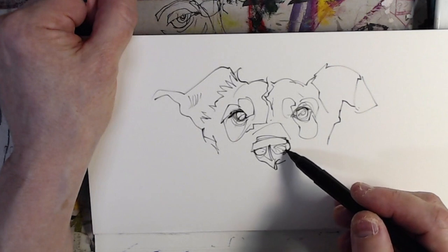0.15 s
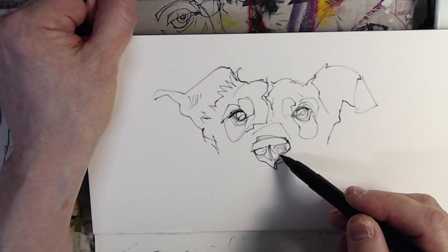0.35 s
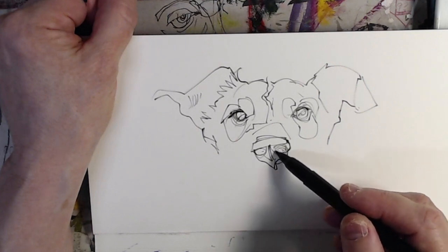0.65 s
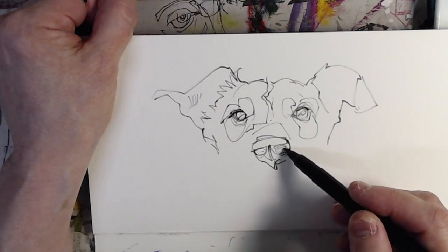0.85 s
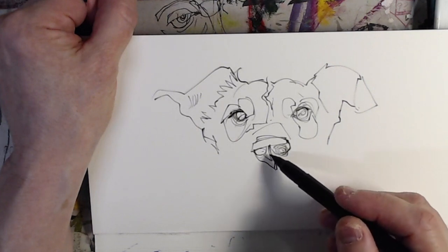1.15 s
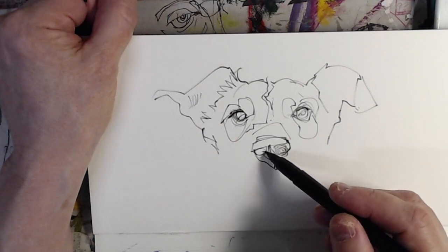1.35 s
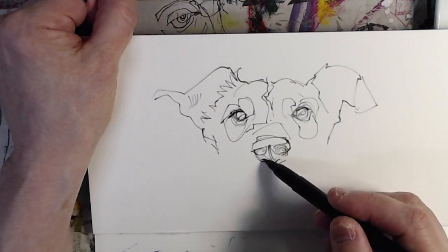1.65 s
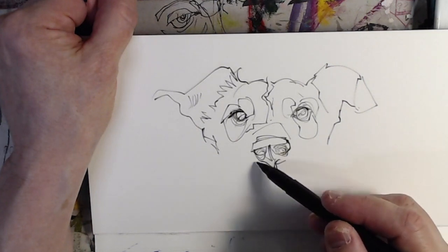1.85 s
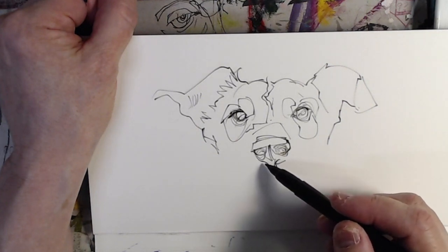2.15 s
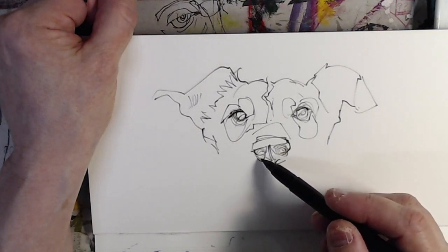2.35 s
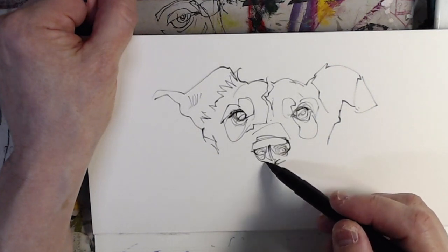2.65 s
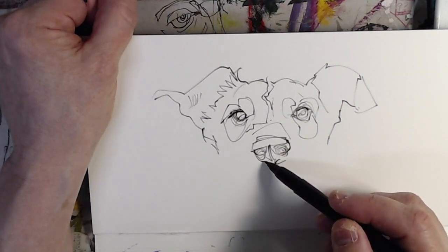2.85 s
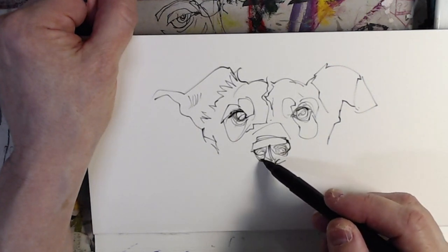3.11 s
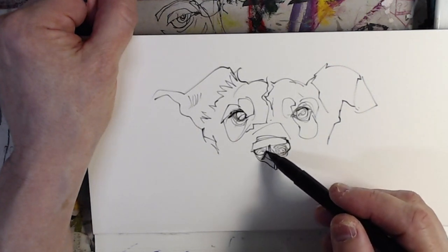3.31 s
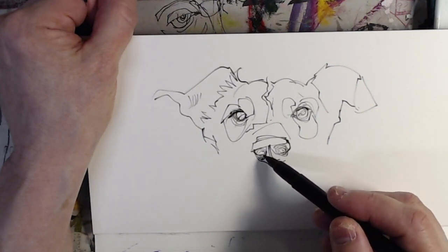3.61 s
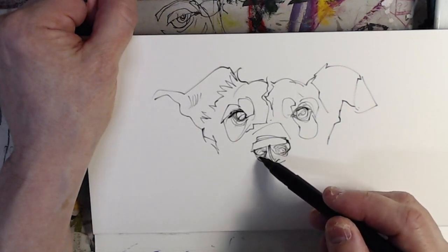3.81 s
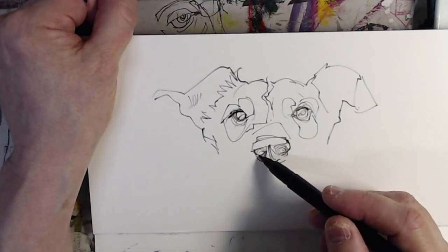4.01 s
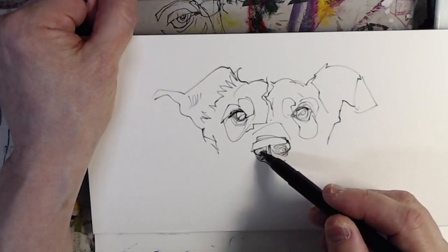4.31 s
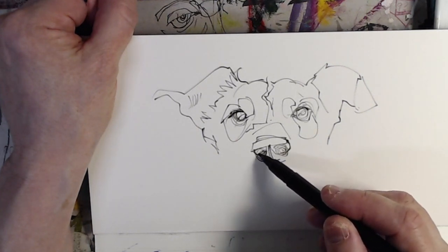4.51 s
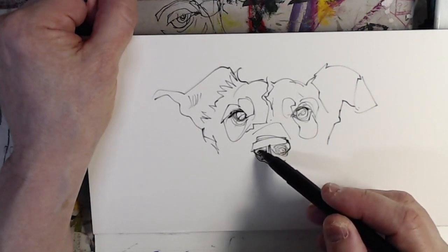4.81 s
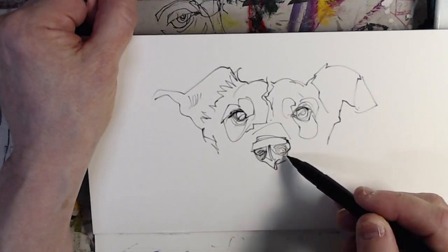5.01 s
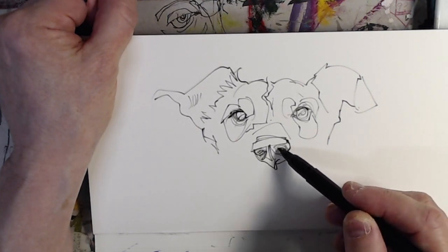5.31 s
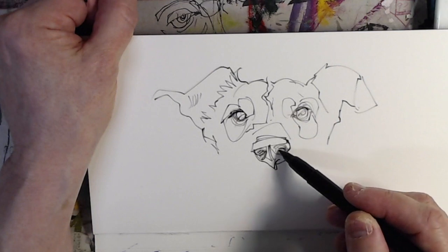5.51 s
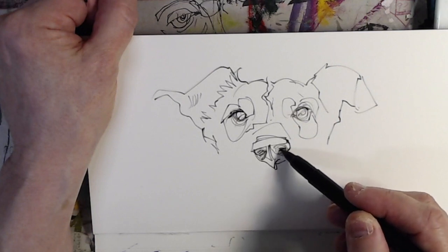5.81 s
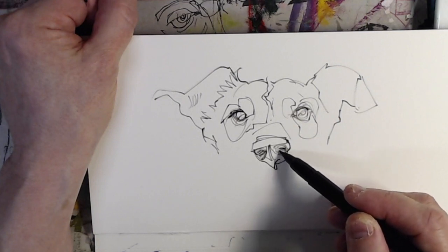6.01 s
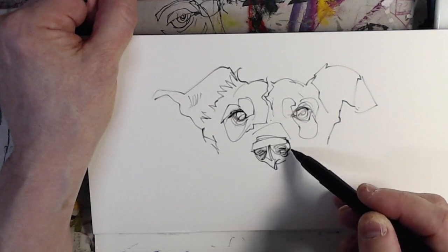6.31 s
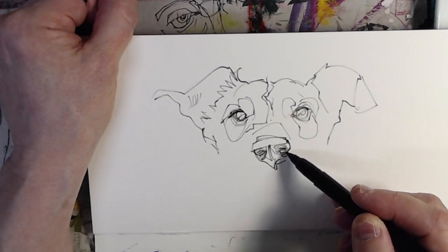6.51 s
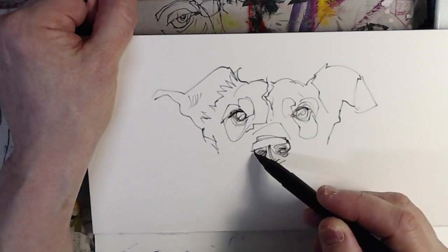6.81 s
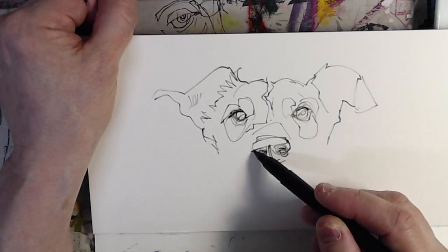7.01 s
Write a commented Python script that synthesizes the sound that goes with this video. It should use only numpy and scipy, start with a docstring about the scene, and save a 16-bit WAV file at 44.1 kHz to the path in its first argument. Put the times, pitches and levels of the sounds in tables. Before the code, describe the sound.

A dry brush pen works on a pad of textured paper, close to the microphone. From the start until about 1.9 seconds it draws several short, scratchy lines, with sharp little ticks as the tip catches in the first second. It pauses, then gives one faint, thin squeak near 3 seconds, followed by a few light dabs. From about 3.8 to 4.9 seconds it hatches quickly back and forth, raspy and slightly hollow, with more small ticks. A second, slightly stronger run lasts from 5.3 to 6.1 seconds and trails off into light strokes. A soft swish crosses the sheet at 6.5 seconds, and a last dab comes around 7. Throughout, a far engine and traffic hum and rumble low through the walls of the quiet room, swelling gently, with a very faint electronic whine.

```python
"""Brush pen on watercolour paper

A dry brush pen draws a few lines, one thin squeak, then two runs of quick hatching. The tip's fibres
catch on the paper's tooth and shake the pad; twice something glides lightly over the sheet.
Behind it a far engine and traffic drone through the walls of a quiet room, and electronics whine faintly."""
import sys
import numpy as np
from scipy import signal
from scipy.fft import rfft, irfft
from scipy.io import wavfile
from scipy.ndimage import uniform_filter1d

SR = 44100
rng = np.random.default_rng(int(sys.argv[2]) if len(sys.argv) > 2 else 0)


def unload_audio(sound):
    """Save the sound as a 16-bit wav file, at the path given as the first command line argument."""
    columns = np.transpose(np.atleast_2d(sound))
    # keep every value between -1 and 1, then stretch to whole-number steps
    steps = np.round(np.clip(columns, -1, 1) * 32767)
    wavfile.write(sys.argv[1], SR, steps.astype(np.int16))


N = 315315
TIME = np.arange(N) / SR


def from_db(db):
    """Decibels to gain."""
    return 10 ** (np.asarray(db) / 20)


def rms_one(x):
    """Scale to unit power."""
    return x / np.sqrt(np.mean(x ** 2) + 1e-20)


def in_time(rows):
    """Automation: one curve per column after the time, straight between the points."""
    times, *columns = np.transpose(rows)
    return [np.interp(TIME, times, column) for column in columns]


def noise():
    """White noise."""
    return rng.standard_normal(N)


def drift(rate_hz):
    """A random wobble, mostly slower than rate_hz; rms 1."""
    hz = np.fft.rfftfreq(N, 1 / SR)
    return rms_one(irfft(rfft(noise()) / (1 + (hz / rate_hz) ** 2), N))


def coloured(x, spectrum):
    """Shape x with an EQ curve that rolls off past both ends; rms 1."""
    hz, db = np.transpose(spectrum)
    grid = np.fft.rfftfreq(N, 1 / SR) + 1e-3
    gain = from_db(np.interp(np.log(grid), np.log(hz), db))
    skirts = np.minimum(grid / hz[0], 1) ** 2 * np.minimum(hz[-1] / grid, 1) ** 2
    return rms_one(irfft(rfft(x) * gain * skirts, N))


def resonate(x, modes, order=1):
    """Parallel resonances of alternating sign; a higher order has steeper skirts; rms 1."""
    out = 0
    for k, (hz, width, db) in enumerate(modes):
        r = np.exp(-np.pi * width / SR)
        gain = (1 - r * r) / 2
        section = [gain, 0, -gain, 1, -2 * r * np.cos(2 * np.pi * hz / SR), r * r]
        out = out + (-1) ** k * from_db(db) * signal.sosfilt([section] * order, x)
    return rms_one(out)


def steady_rumble(modes, hold_s):
    """Noise ringing in narrow modes, its slow swings evened out and its quick beating kept."""
    ring = resonate(noise(), modes, order=2)
    return ring / np.sqrt(uniform_filter1d(ring ** 2, int(hold_s * SR)) + 1e-9)


def swells(rows, rise, fall):
    """One envelope per level column: each gesture peaks and dies away; small powers make it fuller."""
    power = 0
    for start, length, peak, *levels in rows:
        corners = start + length * np.array([0, np.clip(peak, .05, .95), 1])
        phase = np.interp(TIME, corners, [0, .5, 1])
        on, shape = (phase > 0) & (phase < 1), np.zeros(N)
        shape[on] = np.sin(np.pi * phase[on]) ** np.where(phase[on] < .5, rise, fall)
        power = power + from_db(levels)[:, None] ** 2 * shape ** 2
    return np.sqrt(power)


# Room tone EQ: freq_hz, gain_db
AIR_EQ = [(20, -5.5), (34, 6), (48, -0.5), (100, -4), (235, -13.5), (315, -15), (390, -22), (750, -24.5),
          (1300, -30.5), (2200, -37), (4000, -40.5), (6000, -44.5), (7100, -48), (8000, -59.5)]
def still_air():
    """The quiet room's dark bed of noise."""
    return from_db(-49) * coloured(noise(), AIR_EQ)


# Whine partials: pitch_hz, rms_db
WHINE_TONES = [(721, -76), (4110, -76), (6510, -91), (7000, -93.5)]
def electronics():
    """Electronics whine in faint, steady sines."""
    return sum(from_db(db) * np.sqrt(2) * np.sin(2 * np.pi * hz * TIME) for hz, db in WHINE_TONES)


# Traffic EQ: freq_hz, gain_db
TRAFFIC_EQ = [(150, 6.5), (290, 4.5), (400, -6.5), (600, -3.5), (950, -3), (1400, -16.5), (2200, -24.5),
              (4000, -36)]
# Booming traffic resonances: pitch_hz, width_hz, gain_db
TRAFFIC_MODES = [(198.6, 22, -3), (282.9, 25, -8), (312.8, 16, -8.5)]
# Traffic fader: time_s, gain_db
TRAFFIC_FADER = [(0, -59.5), (1.4, -56.5), (2.2, -65), (4.6, -64.5), (5.5, -55.5), (6.2, -54), (6.7, -58)]
def traffic():
    """Far traffic: a dull wash with a booming low end."""
    fader_db, = in_time(TRAFFIC_FADER)
    rumble = from_db(0.7) * steady_rumble(TRAFFIC_MODES, hold_s=0.21)
    return from_db(fader_db) * (coloured(noise(), TRAFFIC_EQ) + rumble)


def low_tone(start_s=5.12, length_s=.6, peak_fraction=.58, level_db=-50, pitch_hz=267.5):
    """A slightly wavering low tone swells once and fades."""
    level, = swells([(start_s, length_s, peak_fraction, level_db)], rise=0.99, fall=0.75)
    hz = pitch_hz * (1 + 0.0094 * drift(12))
    return level * np.sqrt(2) * np.sin(2 * np.pi * np.cumsum(hz) / SR)


# The boom's resonance: pitch_hz, width_hz, gain_db
BOOM_MODE = [(167.8, 8.5, 0)]
# Boom fader: time_s, level_db
BOOM_FADER = [(0, -60), (2.8, -55.5), (4.6, -46.5), (5.8, -58), (6.8, -49)]
def room_boom():
    """A narrow boom grows slowly in the room, sinks and returns."""
    fader_db, = in_time(BOOM_FADER)
    return from_db(fader_db) * steady_rumble(BOOM_MODE, hold_s=0.41)


# The room's lowest modes: pitch_hz, width_hz, gain_db
LOW_MODES = [(65.76, 8, 1), (75.2, 6.6, 4)]
# Their fader: time_s, level_db
LOW_FADER = [(.25, -38.5), (.55, -46.5), (1.65, -40.5), (2.3, -52.5), (2.85, -40), (3.3, -52),
             (4.15, -39.5), (4.55, -42.5), (5.22, -36.5), (5.45, -47.5), (6.1, -40), (6.7, -51)]
# The room's upper modes: pitch_hz, width_hz, gain_db
UPPER_MODES = [(103.6, 5, -8), (121.44, 2.5, -2.5), (132.94, 18, -0.5)]
# Their fader: time_s, level_db
UPPER_FADER = [(0, -49), (3, -44), (5.12, -41.5), (5.9, -45.5), (7.15, -56.5)]
def engine_rumble():
    """The far engine's rough rumble booms in the room's modes."""
    (low_db,), (upper_db,) = in_time(LOW_FADER), in_time(UPPER_FADER)
    low = from_db(low_db) * steady_rumble(LOW_MODES, hold_s=0.16)
    upper = from_db(upper_db) * steady_rumble(UPPER_MODES, hold_s=0.31)
    return low + upper


# Fader of the drone's first two harmonics: time_s, gain_db
DRONE_FADER = [(.2, -42.5), (1, -47), (1.95, -38.5), (2.3, -45.5), (2.95, -41), (4, -39.5), (4.55, -51),
               (5.12, -43), (6.1, -54)]
def engine_drone(firing_hz=71, sag_hz_per_s=.68, mode_hz=208.13, mode_width_hz=6, waver_db=1.4):
    """The firing rate sinks slowly; the third harmonic buzzes as it slides through a room mode."""
    fader_db, = in_time(DRONE_FADER)
    hz = firing_hz - sag_hz_per_s * TIME
    phase = 2 * np.pi * np.cumsum(hz * (1 + 0.0034 * drift(5.05))) / SR
    first, second, third = np.sqrt(2) * np.sin(np.outer([1, 2, 3], phase))
    hum = from_db(fader_db) * (from_db(-8) * first + second)
    in_mode = 1 / (1 + (2 * (3 * hz - mode_hz) / mode_width_hz) ** 2)
    buzz = from_db(-54) * in_mode * third
    return from_db(waver_db * drift(9.3)) * (hum + buzz)


# Light passes over the sheet: start_s, length_s, peak_fraction, level_db
GLIDES = [(1.06, 0.125, 0.64, -61.5), (6.505, 0.17, 0.57, -57)]
# Swish EQ: freq_hz, gain_db
GLIDE_EQ = [(700, -12), (1350, -0.5), (1900, -10.5), (2500, -2), (3350, -1.5), (4200, -12), (5000, -7),
            (5700, -19), (6600, -13.5), (8000, -29.5)]
def glides():
    """With hardly any pressure the paper only gives a smooth, bright swish."""
    level, = swells(GLIDES, rise=1.2, fall=1.1)
    return level * coloured(noise(), GLIDE_EQ)


# The squeak and its faint tail: start_s, length_s, peak_fraction, level_db
SQUEAKS = [(2.946, .095, 0.18, -61), (3.0, .17, .15, -76)]
# Tip resonances: pitch_hz, width_hz, gain_db
SQUEAK_MODES = [(4710, 93, -3), (5500, 220, -21), (6400, 89, -21)]
def squeak():
    """The tip sticks and slips at its own high resonances."""
    level, = swells(SQUEAKS, rise=.7, fall=1.3)
    return level * resonate(noise(), SQUEAK_MODES, order=2)


# Hard catches of the tip: start_s, strength_db
SNAGS = [(0.242, -33.5), (0.437, -38), (0.7819, -34.5), (0.8091, -48), (0.8434, -40), (1.6782, -43.5),
         (3.851, -43), (4.0367, -38), (4.294, -39), (4.4796, -44), (4.5795, -39), (4.655, -36),
         (4.7516, -41.5), (5.844, -36)]
# Body of pad and pen, for snags and rasp alike: pitch_hz, width_hz, gain_db
PAD_MODES = [(520, 86, -5), (877, 78, 0.5), (983, 77, 4), (1097, 90, 2.5), (1340, 54, -1.5),
             (1597, 220, -7), (1893, 100, 2.5), (2095, 170, -2.5), (2300, 260, -8.5), (2790, 120, -8.5)]
def snags():
    """Each sharp catch is a single click that rings the pad."""
    clicks = np.zeros(N)
    for start_s, db in SNAGS:
        clicks[round(start_s * SR)] = from_db(db)
    ring = signal.sosfilt(signal.butter(2, 4500, fs=SR, output="sos"), resonate(clicks, PAD_MODES))
    return from_db(-6.5) * ring * clicks.max() / np.abs(ring).max()


def catches(per_s, spread_db):
    """Fibres slip off the paper's grains: random clicks, many small and a few large."""
    sizes = from_db(spread_db * np.minimum(rng.exponential(1, N), 4))
    return (rng.random(N) < per_s / SR) * sizes * rng.choice([-1, 1], N)


def pad_rasp(rasp, hiss, tooth, balanced_dig_db=5.5, tilt_db_per_db=0.49):
    """Slips shake the pad: a tip that digs in drives the lower modes, one that skims the upper."""
    ring = resonate(catches(per_s=4500, spread_db=2) * tooth, PAD_MODES)
    ring = rms_one(signal.sosfilt(signal.butter(2, 3000, fs=SR, output="sos"), ring))
    dig_db = np.clip(20 * np.log10((rasp + 1e-9) / (hiss + 1e-9)), 0, 20)
    tilt_db = tilt_db_per_db * (dig_db - balanced_dig_db)
    lower = signal.sosfiltfilt(signal.butter(3, 1450, fs=SR, output="sos"), ring)
    return rasp * (from_db(tilt_db / 2) * lower + from_db(-tilt_db / 2) * (ring - lower))


# The pad's hollow note: pitch_hz, width_hz, gain_db
HOLLOW_MODE = [(464.4, 26, 0)]
def pad_hollow(push):
    """The pad's hollow note rings on a little after the tip has left."""
    return resonate(push * noise(), HOLLOW_MODE, order=2) * np.sqrt(np.mean(push ** 2))


# Tip hiss EQ: freq_hz, gain_db
FIBRE_EQ = [(900, -24.5), (1700, -6), (2300, 2.5), (2550, -3.5), (2920, 1), (3120, -10), (3520, -3.5),
            (3800, -6.5), (4400, -8.5), (5200, -17), (5900, -15), (6500, -20), (7200, -28.5), (8000, -37.5)]
def fibre_hiss(hiss, tooth, sharp_db):
    """Dense, tiny slips hiss in the tip; its sharpness lifts or dips the treble."""
    fibres = coloured(catches(per_s=8000, spread_db=0.5) * tooth, FIBRE_EQ)
    treble = signal.sosfiltfilt(signal.butter(2, 4000, "high", fs=SR, output="sos"), fibres)
    return hiss * (fibres + (from_db(sharp_db) - 1) * treble)


# Hatching runs, timed by stroke middles: first_s, last_s, stroke_count
HATCH_RUNS = [(3.782, 4.85, 13), (5.308, 6.048, 9)]
# Paper contact per swing, one row a run: first_fraction, last_fraction, return_rasp_loss_db
HATCH_HAND = [(.64, 0.44, 6), (0.679, 0.41, 7.5)]
# Hand pressure through the hatching: time_s, rasp_db, hiss_db
HATCH_PRESSURE = [(3.78, -61, -65.5), (3.96, -51, -61), (4.05, -50, -58), (4.31, -52.5, -62.5),
                  (4.401, -52, -62.5), (4.49, -53.5, -66.5), (4.67, -48, -59), (4.761, -48.5, -68),
                  (4.85, -65.5, -68.5), (5.31, -46, -61), (5.68, -47, -57), (5.86, -47, -62),
                  (5.961, -57, -68), (6.05, -60, -65.5)]
def hatching(peak_fraction=0.51, return_hiss_db=1):
    """Strokes of an evenly swinging hand: pushes rasp, lighter returns hiss; all shorten through a run."""
    times, rasps, hisses = np.transpose(HATCH_PRESSURE)
    strokes = []
    for (first, last, count), (first_share, last_share, return_loss_db) in zip(HATCH_RUNS, HATCH_HAND):
        middles, swing_s = np.linspace(first, last, count, retstep=True)
        lengths = swing_s * np.linspace(first_share, last_share, count)
        returning = np.arange(count) % 2
        rasp_db = np.interp(middles, times, rasps) - returning * return_loss_db
        hiss_db = np.interp(middles, times, hisses) + returning * return_hiss_db
        strokes += zip(middles - lengths / 2, lengths, np.full(count, peak_fraction), rasp_db, hiss_db)
    return strokes


# Single lines and dabs: start_s, length_s, peak_fraction, rasp_db, hiss_db
PEN_LINES = [(.14, .15, 0.8, -55.5, -59.5), (.285, 0.18, 0.4, -61, -60), (.436, 0.13, .36, -48, -51),
             (.52, 0.13, 0.14, -53.5, -60), (.604, 0.17, 0.6, -62.5, -59), (.778, .18, 0, -50, -55.5),
             (.91, .09, .55, -63, -61.5), (1.376, .17, .35, -57.5, -68.5), (1.523, 0.18, 0.1, -61, -64),
             (1.678, 0.16, 0.13, -51.5, -63.5), (1.795, .07, .65, -59, -64.5),
             (3.162, 0.12, 0.1, -59, -63.5), (3.367, 0.08, .55, -65, -68.5), (3.46, .055, 0.5, -58, -80),
             (3.56, 0.027, 0.3, -66, -69.5), (4.878, 0.033, 0.5, -73, -71.5),
             (4.965, 0.049, .45, -74, -65.5), (5.245, .07, .55, -56.5, -67), (6.07, 0.15, 0.1, -65, -73),
             (6.186, 0.093, .35, -59.5, -64), (7.062, .06, .15, -62, -68)]
# How the pen sits on the sheet: time_s, hollow_db, sharpness_db
PEN_TOUCH = [(.9, -14, -9), (1.6, -11.5, 3), (3.2, -10.5, -1.5), (4.05, -14, 3), (4.35, -6.5, -0.5),
             (4.7, -5, 6.5), (5.3, -13, 0.5)]
def pen():
    """Strokes shake the pad and hiss in the tip; bumps in the paper make both flutter together."""
    rasp, hiss = np.hypot(swells(PEN_LINES, rise=.8, fall=1.5), swells(hatching(), rise=.6, fall=.7))
    hollow_db, sharp_db = in_time(PEN_TOUCH)
    tooth = from_db(2 * drift(52))
    pad = from_db(-0.4) * pad_rasp(rasp, hiss, tooth)
    hollow = from_db(0.5) * pad_hollow(rasp * from_db(hollow_db))
    fibres = from_db(1.03) * fibre_hiss(hiss, tooth, sharp_db)
    return pad + hollow + fibres


def room(x, t60_s, wet_db):
    """Add a short, weak tail of scattered reflections."""
    t = TIME[:SR // 2]
    tail = rng.standard_normal(len(t)) * from_db(-60 * t / t60_s) * (t > .004)
    return x + from_db(wet_db) * signal.fftconvolve(x, tail / np.linalg.norm(tail))[:N]


def scene():
    """A mono mix: the drawing close by, the rest far behind it."""
    drawing = room(pen() + snags() + glides() + squeak(), t60_s=0.19, wet_db=-14)
    engine = engine_drone() + engine_rumble()
    ambience = still_air() + traffic() + low_tone() + room_boom() + electronics()
    return (drawing + engine + ambience)[None]


def record(dry):
    """A narrow-band microphone: the top is cut steeply."""
    cutoff_hz = 7900
    return signal.sosfilt(signal.ellip(10, .1, 80, cutoff_hz, fs=SR, output="sos"), dry)


dry = scene()
out = record(dry)
unload_audio(out)
```